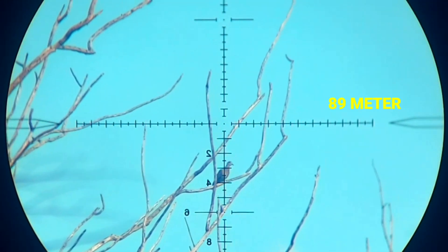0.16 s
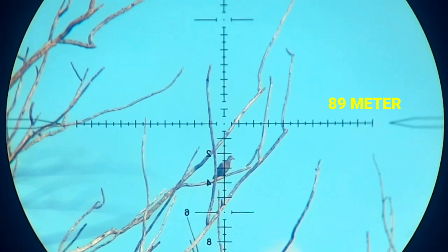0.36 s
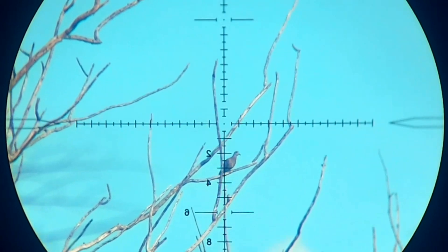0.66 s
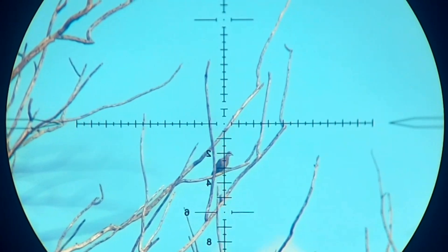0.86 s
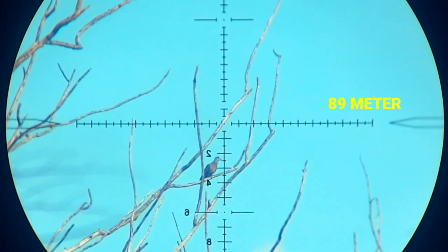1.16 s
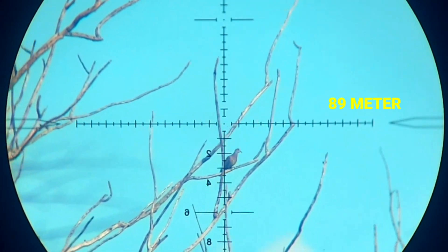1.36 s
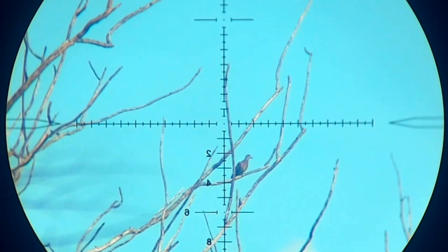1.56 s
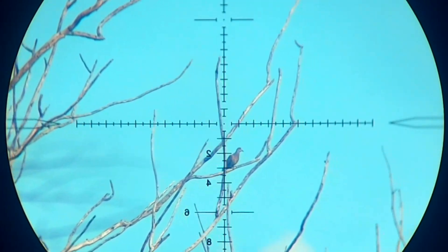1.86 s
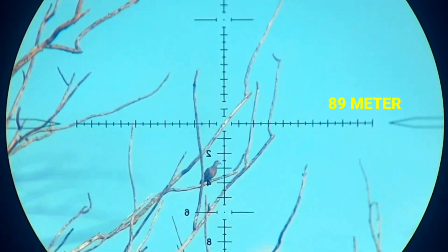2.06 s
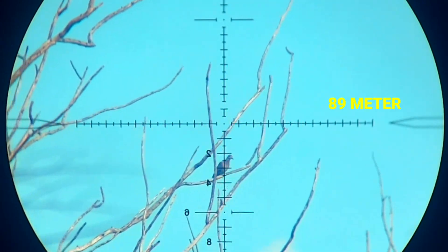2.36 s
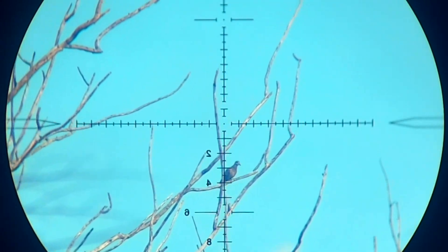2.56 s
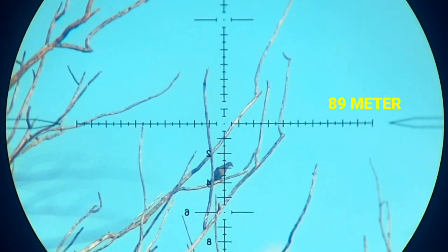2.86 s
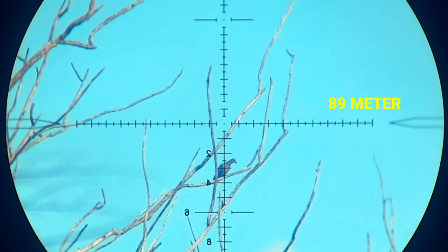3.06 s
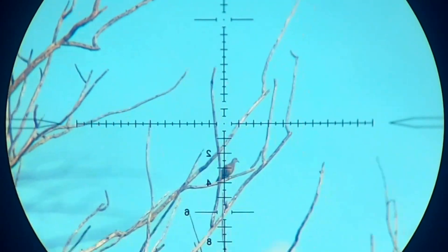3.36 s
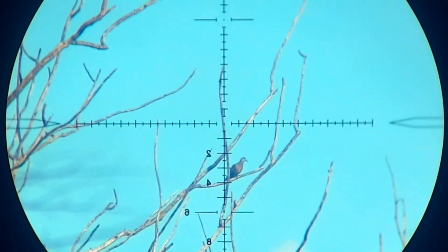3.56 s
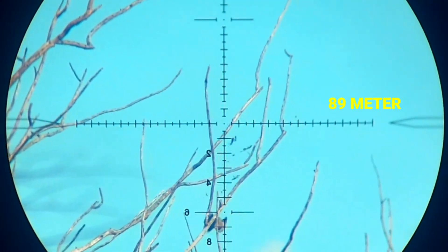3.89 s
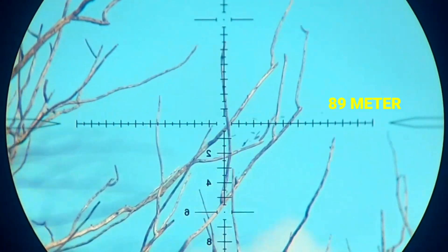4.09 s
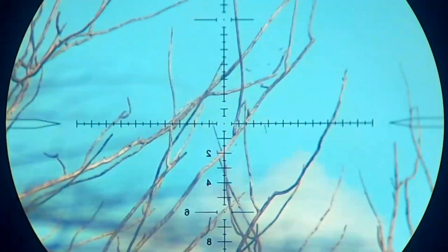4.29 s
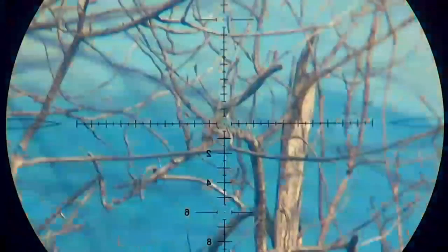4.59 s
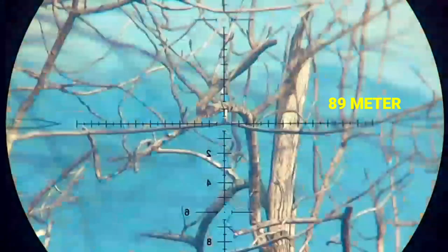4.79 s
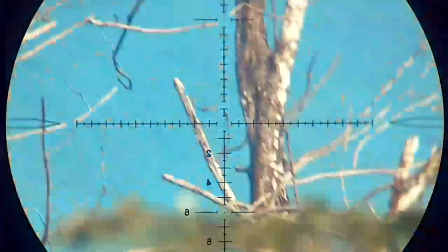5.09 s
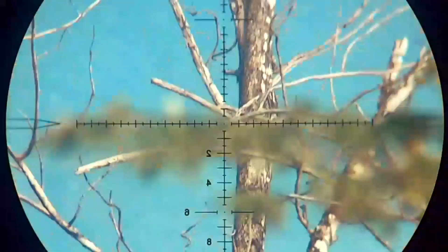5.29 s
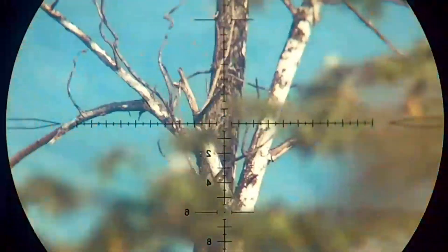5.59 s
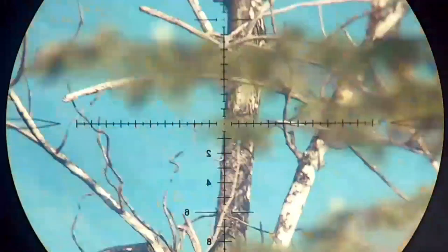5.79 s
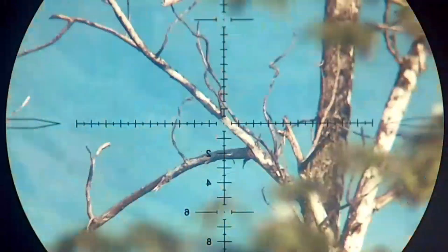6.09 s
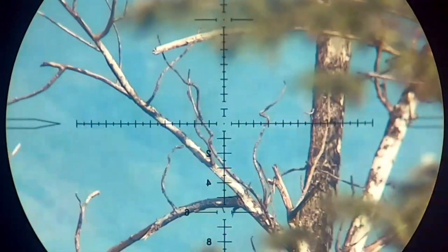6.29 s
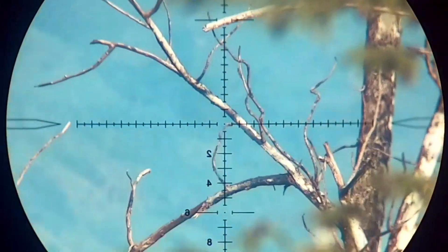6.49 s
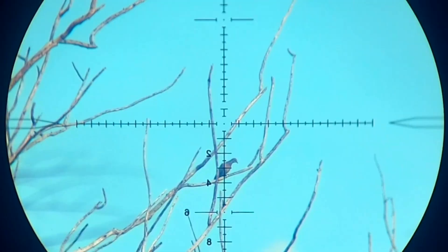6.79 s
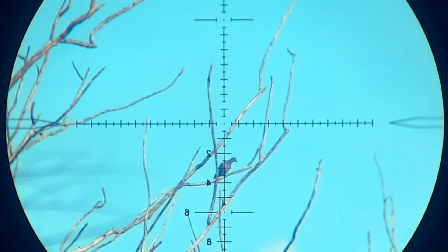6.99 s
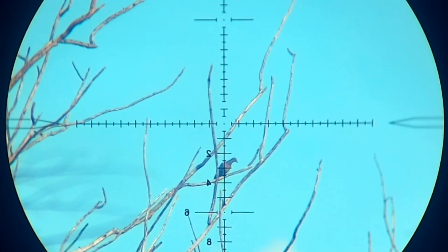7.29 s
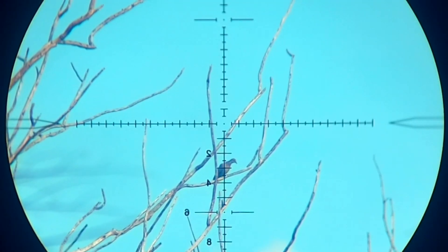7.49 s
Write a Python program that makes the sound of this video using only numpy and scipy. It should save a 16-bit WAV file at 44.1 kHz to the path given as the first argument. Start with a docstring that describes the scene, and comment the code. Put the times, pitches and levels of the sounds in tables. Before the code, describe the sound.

A busy bird colony chatters over leaves and insects; an air rifle cracks once, hands clatter on its stock, and low humming rumble takes over.

```python
"""Air rifle among a colony of birds

Birds whistle, rasp and tick (gliding tones and pulsed resonances) in the trees, over leaves and insects
(coloured noise). An air rifle fires once right at the microphone: noise blasts strike the decaying modes of
coils, spring and barrel. The pellet's distant double hit returns; hands then rub (slipping noise) and knock
(struck modes) on the stock, among short soft noise bursts. At the end a dull, humming rumble of low noise and
wavering tones sets in, and all outdoor sound breaks off abruptly with a small click."""
import sys
import numpy as np
from scipy import signal
from scipy.fft import rfft, irfft, next_fast_len
from scipy.io import wavfile
from scipy.ndimage import map_coordinates

SR = 44100
rng = np.random.default_rng(int(sys.argv[2]) if len(sys.argv) > 2 else 0)


def to_wav(sig):
    """Store sig (one row per channel, or 1-D mono) as 16-bit WAV at the path in sys.argv[1].

    Samples outside -1..1 are clipped; the rate is SR.
    """
    pcm = np.clip(np.atleast_2d(sig), -1, 1) * 32767
    pcm = np.round(pcm).astype(np.int16)
    wavfile.write(sys.argv[1], SR, pcm.T)  # frames by channels


N = 337365
TIME = np.arange(N) / SR
SHOT_S, BIRDS_END_S = 3.48, 6.828
CHIP_OVERTONE_DB = -22.5
# Modes excited by knocks, thumps and rattle. Each row: nominal frequency in Hz, t60 in seconds, level in dB.
STOCK_MODES = [(67.8, 0.44, -18), (102.7, 0.61, -11), (132.6, 0.2, -8.5), (194, 0.23, -2.5),
               (272.6, 0.11, 4), (374, 0.036, -2), (549.3, 0.059, 7.5), (633, 0.032, -9), (806, 0.022, 12),
               (831, 0.026, 3), (915, 0.23, -11), (1077, 0.051, -3), (1268, 0.054, -2), (1394, 0.041, -4),
               (1716, 0.042, -5.5), (1980, 0.046, 1.5), (2320, 0.0084, -2.5), (3210, 0.028, -0.5)]


def undb(db):
    """Amplitude gain is ten to the power of the decibels over twenty."""
    return 10 ** (np.asarray(db) / 20)


def unit(x):
    """Normalisation: mean power is brought to 1."""
    return x / np.sqrt(np.mean(x ** 2) + 1e-20)


def curves(table):
    """Linear interpolation: the columns after the time in seconds, one value a sample."""
    s, *columns = np.transpose(table)
    return [np.interp(TIME, s, c) for c in columns]


def add(track, s, x):
    """Superposition: x is summed into the track from time s."""
    i = int(np.clip(s * SR, 0, N - 1))
    track[..., i:i + x.shape[-1]] += x[..., :N - i]


def colour(x, points):
    """Spectral shaping: x is filtered by a curve through (Hz, dB) points, then brought to rms 1."""
    hz, db = np.transpose(points)
    n = next_fast_len(x.shape[-1])
    f = np.maximum(np.fft.rfftfreq(n, 1 / SR), 1)
    gain = undb(np.interp(np.log(f), np.log(hz), db))
    return unit(irfft(rfft(x, n) * gain, n)[..., :x.shape[-1]])


def band(x, low_hz, high_hz, order=2):
    """Band-pass filtering: only the range between two edges is transmitted."""
    return signal.sosfilt(signal.butter(order, [low_hz, high_hz], "band", fs=SR, output="sos"), x)


def walk(rate, size=N):
    """Random modulation: lines join normal draws, rate of them a second, with a spread near 1."""
    place = np.arange(size) * rate / SR
    draws = rng.standard_normal(int(place[-1]) + 3)
    return map_coordinates(draws, [place], order=1) * np.sqrt(3 / 2)


def ring(t, hz, t60):
    """Free damped vibration: a struck mode loses 60 dB in t60 seconds."""
    return np.sin(2 * np.pi * hz * t) * np.exp(-np.log(1000) * t / t60)


def swell(t, length, attack, release):
    """Exponential relaxation: a rise, a hold, and a decay after the given length."""
    return (1 - np.exp(-t / attack)) * np.exp(-np.maximum(t - length, 0) / release)


def far_port(x, lag_s=.00054):
    """Time of flight: sound reaches the farther microphone port a fraction of a millisecond late."""
    return np.pad(x, (round(abs(lag_s) * SR), 0))[:len(x)]


def after_shot(s):
    """Time step: true for times in the duller part after the shot."""
    return s > SHOT_S


def background(early_db=-56.5, later_db=-62, insect_db=-64, left_db=-4.0):
    """Diffuse field: independent noise in two channels is leaves, far rumour and insects; duller after the shot."""
    # From the lowest leaves and rumour to the chatter of the farthest trees. Each row: Hz, level in dB.
    tree_spectrum = [(30, -1), (95, -16), (160, 8), (300, -7.5), (520, -12), (760, -7), (1050, -15),
                     (1600, -13), (2100, -1.5), (3100, -1), (4000, -8), (5500, -8), (6300, -24.5),
                     (9000, -42.5), (12000, -64.5)]
    # The same, duller, after the shot. Each row: Hz, level in dB.
    later_spectrum = [(18, -52), (30, -30.5), (92, -30.5), (164, -8.5), (503, -30), (690, -26), (994, -30),
                      (1540, -32), (1960, -2), (2160, -11), (2830, -25), (3430, -27), (4070, -20.5),
                      (6000, -35.5), (10000, -50), (13000, -85.5), (22000, -120)]
    # Insects far off. Each row: Hz, level in dB.
    insect_spectrum = [(4500, -25), (5500, 4), (6300, -11.5), (6900, 1.5), (7400, -2.5), (7900, -18),
                       (8700, -25), (10500, -55)]
    early = np.interp(TIME, [SHOT_S, SHOT_S + .06], [1, 0])
    trees = colour(rng.standard_normal((2, N)), tree_spectrum) * undb(early_db + walk(5.7))
    insect_level_db = insect_db + 2.0 * walk(55) + 1.5 * walk(4.6)
    insects = colour(rng.standard_normal((2, N)), insect_spectrum) * undb(insect_level_db)
    later = colour(rng.standard_normal((2, N)), later_spectrum) * undb(later_db + walk(4.7))
    return early * (trees + insects) * undb([[left_db], [0]]) + (1 - early) * later


def later_insects(insect_db=0, pulse_db=4.5):
    """Amplitude modulation: a lower, finely flickering hiss of insects swells and fades after the shot."""
    # Insects after the shot. Each row: Hz, level in dB.
    hiss_spectrum = [(3000, -26.5), (3900, 2.5), (4500, 4), (5050, -9.5), (5700, -27), (8000, -48.5)]
    # Swelling and fading of their hiss. Each row: time in seconds, level in dB.
    hiss_level = [(3.55, -90), (3.62, -72), (3.92, -71), (4.1, -59.5), (4.35, -70.5), (4.65, -57),
                  (5.2, -60), (5.55, -58), (5.85, -62), (6.35, -68), (6.55, -61.5), (6.83, -58)]
    hiss = colour(rng.standard_normal(N) * undb(pulse_db * walk(120)), hiss_spectrum)
    return hiss * undb(curves(hiss_level)[0] + insect_db) * after_shot(TIME)


def colony_level(t):
    """Incoherent addition: the far colony's bell-shaped waves add as powers over a lull, in dB at times t."""
    # The far colony flares up. Each row: crest in seconds, half width in seconds, level in dB.
    waves = [(.2, 0.57, -53), (2.06, 0.18, -51), (2.5, 0.33, -55.5), (3.65, 0.037, -66), (4.2, 0.2, -62),
             (4.95, 0.25, -54.5), (5.619, 0.33, -53.5), (6.15, 0.14, -51.5), (6.6, 0.15, -51.5)]
    lull_db = -77
    bells = sum((undb(db) * np.exp(-.5 * ((t - s) / width) ** 2)) ** 2 for s, width, db in waves)
    return 10 * np.log10(undb(lull_db) ** 2 + bells)


def far_colony(colony_db=-1, ripple_db=3):
    """Random frequency and amplitude modulation: many far calls merge into a chatter in shifting pitch regions."""
    # Colour of the merged calls. Each row: Hz, level in dB.
    chatter_spectrum = [(1500, -38.5), (1850, -3.5), (2100, -3.5), (3000, 1.5), (3700, 0), (4400, -4),
                        (5500, -14), (6500, -18.5), (9000, -45.5)]
    chatter = 0
    for hz in np.geomspace(1950, 5600, num=9):
        pitch = hz * np.exp(.05 * walk(25) + 0.058 * walk(1200))
        grain = undb(ripple_db * walk(16) + 4.4 * walk(260))
        chatter = chatter + grain * np.sin(2 * np.pi * np.cumsum(pitch) / SR)
    return colour(chatter, chatter_spectrum) * undb(colony_level(TIME) + colony_db)


def rasp(length, low_hz, high_hz, upper_db, hiss_db, pulse_hz=125, jitter=.16, scatter_db=2.5,
         pulse_s=0.00087, spread=0.098, noisy=0.9, width_hz=780, fall=0.18):
    """Pulsed excitation: the syrinx opens unevenly, puffing hiss and tiny falling chirps in two sinking resonances."""
    t = np.arange(int((length + 0.021) * SR)) / SR
    cycle = np.cumsum(pulse_hz * np.exp(jitter * walk(70, size=len(t)))) / SR
    k = cycle.astype(int)
    age = (cycle - k) / pulse_hz / pulse_s  # time since the opening, in pulse rise times
    size, bend_low, bend_high = rng.standard_normal((k[-1] + 1, 3))[k].T
    gate = (age * np.exp(1 - age) + 1.2) * undb(scatter_db * size)
    sink = fall * (.5 - np.minimum(t / length, 1))
    out = 0
    for hz, bend, db, slide in ((low_hz, bend_low, 0, sink), (high_hz, bend_high * .6, upper_db, sink / 2)):
        pitch = hz * np.exp(slide + spread * (.7 * bend + np.exp(-age / 2) - .5))
        grit = 1 + noisy * walk(1800, size=len(t))
        voice = gate * grit * np.sin(2 * np.pi * np.cumsum(pitch) / SR)
        out = out + undb(db) * unit(band(voice, hz - width_hz, hz + 0.71 * width_hz, order=2))
    hiss = unit(gate * band(rng.standard_normal(len(t)), low_hz, high_hz))
    return (out + undb(hiss_db) * hiss) * swell(t, length, 0.011, 0.0021)


def rasp_call(s, length, hz, db, upper_db=-3, hiss_db=-12):
    """Resonance tracking: the upper resonance lies near the octave, up to a ceiling that is lower after the shot."""
    ceiling_hz = 4215 if after_shot(s) else 5650
    upper_hz = min(2.03 * hz, ceiling_hz)
    return undb(db) * rasp(length, hz, upper_hz, upper_db, hiss_db)


def whistle(length, first_hz, last_hz, octave_db, quaver, flutter_db=3, hoarse=0.43):
    """Frequency modulation: a slur with its octave, made hoarse by fast irregular trembling of the syrinx."""
    even_slur_s = 0.04  # a note of this length glides evenly; a longer one holds its pitch before it slides
    t = np.arange(int((length + 0.045) * SR)) / SR
    glide = np.minimum(t / length, 1) ** (length / even_slur_s)
    pitch = (first_hz + (last_hz - first_hz) * glide) * (1 + quaver * walk(500, size=len(t)))
    phase = 2 * np.pi * np.cumsum(pitch) / SR
    tone = np.sin(phase) + undb(octave_db) * np.sin(2 * phase)
    tremble = undb(flutter_db * walk(220, size=len(t))) * (1 + hoarse * walk(900, size=len(t)))
    return unit(tone * tremble) * swell(t, length, 0.0073, 0.0031)


def whistle_call(s, length, first_hz, last_hz, db, quaver=0.045):
    """Harmonic balance: a slur's octave depends on its mean pitch and is held down after the shot."""
    # Octave of a slur, before the limit after the shot. Each row: mean pitch in Hz, octave level in dB.
    octave_curve = [(2000, -12), (2650, -17), (3100, -9.5), (3300, -7)]
    octave_db = np.interp((first_hz + last_hz) / 2, *np.transpose(octave_curve))
    if after_shot(s):
        octave_db = min(octave_db, -15)
    return undb(db) * whistle(length, first_hz, last_hz, octave_db, quaver)


def chip(hz, overtone_db, rise_s=0.0012, fall=0.11, snap_db=-11):
    """Transient excitation: a tick is a broad snap and a few milliseconds of steeply falling pitch."""
    age = np.arange(int(0.02 * SR)) / SR / rise_s  # in rise times
    bend = fall * (2 * np.exp(-age / 2) - 1) + 0.053 * walk(1500, size=len(age))
    phase = 2 * np.pi * np.cumsum(hz * (1 + bend)) / SR
    snap = unit(band(rng.standard_normal(len(age)), .7 * hz, 1.3 * hz))
    tone = np.sin(phase) + undb(overtone_db) * np.sin(1.7 * phase)
    return age * np.exp(1 - age) * (tone + undb(snap_db) * snap)


def faint_calls(count, low_hz=2000, high_hz=3200, length=0.052, fall=0.088):
    """Random scattering in time: birds farther off rasp, tick and slur, as loud as the colony is busy."""
    rasp_db, chip_db, slur_db = -3, 5.5, 0  # over the level of the far colony
    out = np.zeros(N)
    for k, chance in enumerate(rng.random((count, 6))):
        times = (k + chance[:3]) * BIRDS_END_S / count
        hz = low_hz * (high_hz / low_hz) ** chance[3:]
        db = colony_level(times)
        add(out, times[0], rasp_call(times[0], length, hz[0], db[0] + rasp_db))
        add(out, times[1], undb(db[1] + chip_db) * chip(hz[1], CHIP_OVERTONE_DB))
        add(out, times[2], whistle_call(times[2], length, hz[2], hz[2] * (1 - fall), db[2] + slur_db))
    return out


def birds(rasp_db=-3.1, whistle_db=-1, chip_db=1):
    """Superposition of near and faint calls; the band-pass removes what lies under the syrinx's lowest note."""
    # Buzzy calls. Each row: start in seconds, length in seconds, nominal pitch in Hz, level in dB before
    # the common trim, upper resonance in dB, hiss in dB.
    rasps = [(0, .083, 2816, -36.5, -12.5, -17), (0.119, 0.017, 2680, -38, -9, -11),
             (0.241, 0.054, 2887, -38.5, -6.5, -21), (0.407, .11, 2834, -40, -7.5, -17),
             (.984, .034, 3080, -50.5, -12, 0), (1.195, .021, 2930, -37.5, -7.5, -8),
             (1.425, 0.058, 2705, -44.5, -13.5, -14), (1.851, .12, 2746, -45.5, -13, 2),
             (2.033, 0.063, 2526, -47.5, -3.5, -3), (2.128, 0.1, 2583, -51, 0.5, -6),
             (2.309, 0.035, 2440, -42, -15, -7), (2.356, 0.089, 2477, -46, -9, -11),
             (2.561, .09, 2390, -46, -3.5, -7.5), (2.629, 0.12, 2800, -55, 4.5, -6),
             (2.747, 0.11, 2264, -46, -5.5, -9), (2.924, 0.05, 2338, -45.5, -5, -6),
             (3.204, .022, 2860, -41, -4, -2), (3.261, .06, 2620, -47.5, -4, -7),
             (3.44, .014, 2665, -32, -9, -13), (3.601, 0.085, 2394, -63.5, -1.5, -6),
             (3.67, 0.0375, 2530, -49, -12, -7.5), (3.989, 0.2, 2118, -51, -1.5, -20),
             (4.205, 0.16, 2098, -57, -1.5, -17), (4.58, 0.14, 2110, -54, -2, -17.5),
             (4.881, 0.036, 2490, -44, -1, -8), (5.125, .043, 2685, -45, -4, -8),
             (5.529, 0.071, 2980, -39.5, -13, -4), (5.971, 0.038, 2820, -39, -7, -9),
             (6.277, .029, 2920, -50.5, -1.5, -2), (6.485, .11, 2815, -53, 2, -6),
             (6.665, 0.048, 2915, -55.5, -0.5, 2)]
    # Slurred notes. Each row: start in seconds, length in seconds, first and last pitch in Hz, level in dB
    # before the common trim, quaver as a share of the pitch.
    slurs = [(0.425, 0.046, 3410, 3100, -46, 0.037), (0.643, 0.066, 3400, 2990, -44, 0.064),
             (0.695, 0.051, 2990, 1894, -43, 0.057), (1.703, 0.048, 3470, 2840, -42.5, 0.057),
             (1.885, 0.019, 3050, 3030, -40, 0.018), (2.04, 0.096, 2600, 2010, -50.5, 0.027),
             (2.146, 0.046, 2318, 1920, -40, 0.03), (2.36, .08, 2147, 2030, -55, .03),
             (2.923, 0.059, 2635, 1975, -46, 0.029), (3.106, 0.06, 2330, 1944, -42, 0.037),
             (3.201, 0.025, 3530, 3116, -42.5, 0.067), (3.217, 0.032, 2280, 1870, -45, .025),
             (3.263, .065, 1851, 2130, -41.5, 0.045), (3.437, 0.027, 2800, 2166, -32.5, 0.014),
             (3.794, 0.033, 1956, 2024, -49.5, .02), (3.973, 0.071, 2080, 1910, -47, 0.013),
             (4.143, 0.033, 2090, 1905, -51, .025), (4.411, 0.033, 2720, 1846, -46.5, .03),
             (4.474, 0.052, 1952, 2063, -45.5, 0.016), (4.748, .032, 2760, 2428, -42, 0.026),
             (4.915, 0.058, 3320, 3050, -39.5, 0.021), (5.388, 0.051, 2474, 2237, -42, 0.03),
             (6.068, 0.03, 3150, 3110, -45, 0.037), (6.243, 0.051, 3186, 3163, -49, 0.034),
             (6.477, 0.12, 3200, 3020, -49, 0.065), (6.716, 0.05, 2186, 2122, -43, 0.006),
             (6.767, 0.071, 3167, 3340, -40.5, 0.024)]
    # Ticks. Each row: time near the peak in seconds, level in dB before the common trim, nominal pitch in Hz.
    ticks = [(.2495, -35, 3000), (0.346, -42, 2940), (.415, -33, 2820), (.91, -39.5, 4860),
             (.9783, -37, 4660), (1.005, -46, 3070), (1.062, -46, 3260), (1.1412, -42, 3070),
             (1.2, -35, 2960), (1.264, -44.5, 3130), (1.3175, -39.5, 3040), (1.371, -40, 3050),
             (1.424, -36.5, 3030), (1.464, -42, 2850), (1.478, -42, 3120), (1.538, -46, 3000),
             (1.607, -42.5, 3390), (2.3063, -37.5, 3413), (2.931, -39, 2380), (3.077, -48, 1980),
             (3.078, -45, 4640), (3.9928, -34.5, 1940), (4.26, -46.5, 3800), (4.272, -46, 3670),
             (4.284, -49, 3220), (4.292, -40, 2360), (5.2835, -29, 2050), (5.394, -28, 2410),
             (5.523, -36, 2060), (5.649, -34, 1970), (5.665, -36, 2980), (5.785, -43, 3300),
             (5.848, -41, 3520), (5.9586, -32, 2270), (5.9945, -31.5, 2720), (6.004, -32, 2640),
             (6.022, -35, 2360), (6.0325, -36, 2180), (6.2654, -31, 2100), (6.284, -35.5, 3170),
             (6.432, -29, 2120), (6.451, -34.5, 2130), (6.453, -37, 4330), (6.4692, -27.5, 2480),
             (6.478, -30, 2690), (6.51, -34, 2110), (6.557, -37, 2140), (6.6731, -27.5, 2075),
             (6.712, -22.5, 2144)]
    out = faint_calls(count=12)
    for s, *call in rasps:
        add(out, s, undb(rasp_db) * rasp_call(s, *call))
    for s, *call in slurs:
        add(out, s, undb(whistle_db) * whistle_call(s, *call))
    for s, db, hz in ticks:
        add(out, s - .001, undb(db + chip_db) * chip(hz, CHIP_OVERTONE_DB))
    return band(out, low_hz=1828, high_hz=6340, order=7)


def among_trees(x, t60=0.22, echo_db=-3.5, left_db=-5):
    """Scattering: direct sound comes from the right; trunks and branches send a short tail to both ports."""
    t = np.arange(int(.45 * SR)) / SR
    tail = rng.standard_normal((2, len(t))) * np.exp(-np.log(1000) * t / t60) * (1 - np.exp(-t / 0.0015))
    tail /= np.sqrt(np.sum(tail ** 2, axis=1, keepdims=True))
    direct = np.array([undb(left_db) * far_port(x), x])
    return direct + undb(echo_db) * signal.fftconvolve(x[None], tail, axes=1)[:, :N]


def stop_click(click_db=-32, decay_s=0.0012):
    """Impulsive noise: a small dry click, decaying exponentially, where the outdoor sound breaks off."""
    out = np.zeros(N)
    t = np.arange(int(0.0203 * SR)) / SR
    spectrum = [(300, -11), (800, 7.5), (1800, 5), (4000, -19), (8000, -34), (15000, -45)]
    click = colour(rng.standard_normal(len(t)), spectrum)
    add(out, BIRDS_END_S - .003, undb(click_db) * click * np.exp(-t / decay_s))
    return out


def rumble(heave_db=-43, waver=0.01232):
    """Noise and tones combined: a dull rustling rumble over a slow heave, with a wavering hum in it."""
    # Lower part of the rumble. Each row: Hz, level in dB.
    low_spectrum = [(12, -30), (20, -9), (43, -7), (108, -2.5), (145, -5), (221, -10.5), (256, -14.5),
                    (286, -16), (380, -32), (490, -53), (840, -120)]
    # Its upper, rustling part. Each row: Hz, level in dB.
    high_spectrum = [(200, -14.5), (330, -2), (430, -0.5), (700, -12), (1100, -20.5), (2300, -28),
                     (2450, -66)]
    # Harmonics of the hum. Each row: nominal frequency in Hz, nominal rms level in dB.
    hum_partials = [(145, -44), (290, -54), (435, -61.5)]
    heave_spectrum = [(2, -20.0), (7, -8.5), (13, -13.0), (35, -11.5), (100, -63.0), (400, -140)]
    start_s, settle_s = 6.478, 0.66
    age = np.maximum(TIME - start_s, 0)
    low_db = -37.5 - 1.5 * age  # sinks slowly
    high_db = -57 + 12.5 * np.exp(-age / settle_s)  # settles soon after the onset
    low = colour(rng.standard_normal(N), low_spectrum) * undb(low_db)
    high = colour(rng.standard_normal(N) * undb(1.2 * walk(50)), high_spectrum) * undb(high_db)
    heave = undb(heave_db) * colour(rng.standard_normal(N), heave_spectrum)
    turns = np.cumsum(1 + waver * walk(8)) / SR  # wavering time shared by the harmonics
    hum = sum(np.sqrt(2) * undb(db + 2 * walk(6.2)) * np.sin(2 * np.pi * hz * turns)
              for hz, db in hum_partials)
    return (low + high + heave + hum) * np.clip((TIME - start_s) / 0.00066, 0, 1)


def soft_bursts(burst_db=0):
    """Band-limited noise: short soft bursts are low rustles, scrapes, hum after knocks and thumps in the rumble."""
    # Short soft noise bursts. Each row: start in seconds, length in seconds, level in dB, centre in Hz,
    # ratio of either edge to the centre.
    bursts = [(1.851, 0.055, -55, 179, 1.36), (2.345, 0.049, -65.5, 288, 1.44),
              (5.01, 0.028, -34.5, 190, 1.22), (5.055, 0.039, -37.5, 162, 1.7),
              (5.558, 0.05, -39, 1144, 1.7), (5.577, 0.15, -38.5, 252, 1.12),
              (5.705, 0.068, -38.5, 93, 1.2), (5.966, 0.026, -30.5, 700, 1.47),
              (6.034, 0.061, -39.5, 1480, 1.77), (6.215, 0.062, -46.5, 1630, 2.02),
              (6.48, 0.024, -37.5, 209, 1.55), (6.515, 0.034, -35, 57.5, 1.3),
              (6.697, 0.032, -41, 300, 1.12), (7.089, 0.011, -37, 417, 1.25)]
    out = np.zeros(N)
    t = np.arange(int(.25 * SR)) / SR
    for s, length, db, hz, width in bursts:
        grains = rng.standard_normal(len(t)) * undb(1.6 * walk(300, size=len(t)))
        burst = unit(band(grains, hz / width, hz * width, order=3))
        add(out, s, undb(db + burst_db) * burst * swell(t, length, 0.0031, 0.0097))
    return out


def rubbing(rub_db=0, scrape_db=-6, grain_db=4):
    """Sliding friction: hands move on the stock in small slips that roughen the noise."""
    # Hands sliding on the stock. Each row: time in seconds, level in dB before the trims.
    effort = [(4.6, -70), (4.718, -60), (4.842, -51.5), (5.022, -47), (5.192, -41.5), (5.36, -41.5),
              (5.47, -58.5), (5.872, -54), (6.156, -58.5), (6.45, -60)]
    # Low part of the sliding. Each row: Hz, level in dB.
    low_spectrum = [(24, -38.5), (40, -8.5), (92, -4.5), (124, -8), (199, -6), (292, -13), (364, -20),
                    (500, -17.5), (650, -61), (1100, -120)]
    # Scraping part. Each row: Hz, level in dB.
    high_spectrum = [(260, -61), (450, -18.5), (585, 6.5), (856, 3), (994, 5), (1110, 4), (1470, -3),
                     (2000, -24), (2600, -38), (4400, -120)]
    effort_db = curves(effort)[0]
    slips = undb(grain_db * walk(110))
    low = colour(rng.standard_normal(N) * slips, low_spectrum) * undb(effort_db + rub_db)
    high = colour(rng.standard_normal(N) * slips, high_spectrum) * undb(effort_db + scrape_db)
    return (low + high) * np.interp(TIME, [4.55, 4.65, 6.4, 6.5], [0, 1, 1, 0])


def rattle(slips_per_s=260, scatter_db=4.5, damped_s=0.015):
    """Stick-slip: the shifting grip ticks densely into the stock's upper modes, damped by the hand."""
    # The grip shifts. Each row: start in seconds, length in seconds, level in dB.
    shifts = [(4.766, 0.055, -49.5), (5.133, 0.12, -41.5), (5.557, .16, -47)]
    lowest_hz = 480  # modes up to this are not stirred
    out = np.zeros(N)
    t = np.arange(int(.4 * SR)) / SR
    for s, length, db in shifts:
        slips = (rng.random(len(t)) < slips_per_s / SR) * undb(scatter_db * rng.standard_normal(len(t)))
        body = 0
        for hz, t60, mode_db in STOCK_MODES:
            if hz > lowest_hz:
                ticks = slips * rng.standard_normal(len(t))
                response = ring(t, hz, min(t60, damped_s))
                body = body + undb(mode_db) * signal.fftconvolve(ticks, response)[:len(t)]
        grating = unit(band(body, low_hz=300, high_hz=4500, order=3))
        add(out, s, undb(db) * grating * swell(t, length, 0.0061, 0.014))
    return out


def knocks_and_thumps(knock_db=-1, chatter_db=-6, tone_db=2, tick_db=-44, tick_s=.0022, rise_s=0.0034,
                      waver=0.066):
    """Modal excitation: each blow rings the modes; its spot sounds a short note and grates, hard contacts tick."""
    # First the pellet's distant double hit (two rows), then knocks on the stock. Each row: time in seconds,
    # level in dB before the trims, hardness in dB more clack and less thud, nominal note of the spot in Hz,
    # contact rise in seconds, tick in dB before its trims.
    contacts = [(4.055, -60, 4, 596, .004, -7), (4.082, -59.5, 7, 1110, 0.0036, -7),
                (4.397, -69.5, 7, 1100, .004, -10.5), (4.667, -43.5, -.5, 586, 0.0047, -9),
                (4.714, -48, 0.5, 816, 0.0051, -5), (4.742, -62, 0.5, 1510, .002, 14),
                (4.784, -41, 4, 1780, 0.005, 4), (4.814, -55, 1.5, 900, .003, 14.5),
                (4.993, -39, -9, 545, 0.0078, -9), (5.118, -46.5, -12, 167, 0.0035, -5),
                (5.147, -41, 6.5, 600, 0.0028, 4), (5.172, -43, 3, 736, 0.0055, 1),
                (5.207, -37.5, 1, 584, 0.0047, 1), (5.234, -37.5, -1.5, 620, 0.0045, 3),
                (5.261, -36, -1.5, 636, 0.0056, 0), (5.287, -36.5, 0, 550, .0045, -4),
                (5.312, -43, -12, 192, 0.0037, -5), (5.334, -40.5, 4, 1490, 0.0027, -4),
                (5.3405, -28.5, 7, 1510, .0036, -2), (5.355, -41, -4, 302, 0.0022, -5),
                (5.373, -43.5, -5, 150, 0.0057, -3), (5.439, -33, 5, 546, 0.0038, -3),
                (5.447, -40, -4.5, 270, 0.0056, -8), (5.482, -56.5, 10.5, 1290, 0.0037, -4),
                (5.569, -32, 2, 774, .0035, -3), (5.601, -27, 3, 1685, 0.0042, 6),
                (5.623, -40, 0, 285, 0.0064, -4), (5.65, -47, -3.5, 292, 0.0042, -4),
                (5.684, -31.5, 2, 554, 0.005, -7), (5.704, -27.5, 4.5, 1710, 0.0025, -9),
                (5.816, -43, 0, 1240, 0.0041, -6), (5.899, -43.5, -4.5, 574, 0.0038, -12),
                (5.979, -29, 1.5, 662, .0065, 7), (6.132, -58.5, 14, 1515, .004, 5)]
    # Middle modes against a blow's level; heavy blows mostly go into thud and clack instead.
    # Each row: blow level in dB, middle level in dB relative to it.
    middle_curve = [(-61, 7), (-36.5, 2), (-34, -2.5), (-16, 4.5)]
    tick_spectrum = [(500, -7.0), (2000, 0.5), (4500, -9), (8500, -8.0), (10000, -54.0)]
    zone_hz = [250, 700, 1500]  # thud, middle, clack
    out = np.zeros(N)
    t = np.arange(int(.35 * SR)) / SR

    def push(length):
        """Contact force: a smooth pulse that peaks after the given length."""
        return (t / length) ** 2 * np.exp(2 - 2 * t / length)

    for s, level_db, hard_db, spot_hz, contact_s, sharp_db in contacts:
        middle_db = np.interp(level_db, *np.transpose(middle_curve))
        zones = level_db + np.array([-hard_db, middle_db, hard_db])
        zone_db = lambda hz: np.interp(np.log(hz), np.log(zone_hz), zones)
        detune = 1 + .045 * rng.standard_normal(len(STOCK_MODES))
        sign = rng.choice([-1, 1], len(STOCK_MODES))
        body = sum(g * undb(db + zone_db(hz)) * ring(t, hz * d, t60)
                   for (hz, t60, db), d, g in zip(STOCK_MODES, detune, sign))
        grate = sum(undb(db) * unit(band(rng.standard_normal(len(t)), hz / 1.307, hz * 1.305, order=3))
                    for hz, db in zip(zone_hz, zones))
        pitch = spot_hz * (1 + waver * walk(300, size=len(t)))
        note = undb(zone_db(spot_hz)) * np.sin(2 * np.pi * np.cumsum(pitch) / SR)
        tick = colour(rng.standard_normal(len(t)), tick_spectrum)
        tick_level_db = (level_db + hard_db) / 2 + tick_db + sharp_db
        add(out, s - .003, push(contact_s) * (undb(chatter_db) * grate + undb(tone_db) * note))
        add(out, s - .003, push(tick_s) * undb(tick_level_db) * tick)
        add(out, s - .002, undb(knock_db) * body * (1 - np.exp(-t / rise_s)) ** 2)
    return out


def bounces(count):
    """Periodic impact: the spring bounces evenly in a swelling and fading rattle; rows as for the shot's blows."""
    start_s, gap_s, decay_s = 3.4905, .0083, 0.0091
    level_db, swell_db, thump_db, tilt_db = -23.5, 3.5, -11.5, -1.5
    return [(start_s + k * gap_s, level_db + swell_db * np.sin(np.pi * (k + .5) / count),
             decay_s, thump_db, tilt_db) for k in range(count)]


def shot(left_db=-3, own_db=-9, low_hz=70, blast_db=2, body_db=-9, coil_db=-9, lag_s=.0004):
    """Impulse response: hammer, air blast and spring rattle thump and clang the rifle; spring and barrel ring on."""
    # Blows from sear to air blast and the piston's rebound. Each row: start in seconds, level in dB before
    # the blast trim, decay in seconds, recoil thump in dB, brightness in dB per octave.
    blows = [(3.443, -43.5, 0.016, -46.5, -0.5), (3.456, -30, 0.033, -42, -1.5),
             (3.4683, -26.5, 0.0073, -22, 2.5), (3.4748, -9, 0.004, -11, 0), (3.48, -7.5, 0.0025, -8.5, 0),
             (3.496, -19, 0.0065, -16, -0.5), (3.5132, -15, 0.0076, -32.5, -2.5)]
    # Blast before the brightness tilt. Each row: Hz, level in dB.
    blast_spectrum = [(210, -56), (350, -19.5), (429, -16.5), (495, -17.5), (721, -8), (928, -11.5),
                      (1050, 4), (1370, -3.5), (1740, -0.5), (2200, -11.5), (2750, -17.5), (3590, -20.5),
                      (4200, -30), (6000, -27), (8520, -26), (11000, -47), (15000, -63.5)]
    # The spring's coils clang at each blow. Each row: Hz, t60 in seconds, level in dB before the coil trim.
    coil_modes = [(690, 0.044, -10.5), (1090, 0.051, -8.5), (1230, .055, 4), (1428, 0.059, 2),
                  (1705, 0.043, 0.5), (1892, .04, -3.5)]
    # Modes that the recoil sets ringing. Each row: Hz, t60 in seconds, level in dB relative to the thump,
    # amplitude in the left channel as a signed share of the right.
    recoil_modes = [(74, 0.19, -4.5, .1), (126, 0.082, -14, 0.13), (198, 0.087, -11.5, -0.14),
                    (242.7, 0.067, 1, -0.34), (290, 0.046, -11, -0.33), (407, 0.091, -13.5, -0.34)]
    # The piston slams home with a short hard crack. Each row: Hz, t60 in seconds, level in dB, left share.
    slam_modes = [(1350, .024, -7, -.3), (1790, .026, -9, 0.77), (2010, .02, -12, .9)]
    # Spring and barrel ring on. Each row: Hz, t60 in seconds, level in dB before the slow rise, left share.
    long_rings = [(97, .34, -25, .05), (113, .22, -21, .05), (142, .31, -13.5, .06), (194, .3, -31, .1),
                  (929, .26, -14.5, -.3)]
    pivot_hz = 1500  # brightness tilts the blast about this frequency
    slam_s, ring_rise_s = 3.4808, .025  # the long rings build up over the rattle
    out = np.zeros((2, N))
    t = np.arange(int(.6 * SR)) / SR
    for s, db, decay, thump_db, tilt_db in blows + bounces(count=5):
        spectrum = [(hz, level_db + tilt_db * np.log2(hz / pivot_hz)) for hz, level_db in blast_spectrum]
        noise = colour(rng.standard_normal((2, len(t))), spectrum)
        crack, own = noise * swell(t, 0.00035, 0.0011, decay)  # own sounds in the left channel alone
        clang = sum(rng.choice([-1, 1]) * undb(mode_db) * ring(t, hz, t60) for hz, t60, mode_db in coil_modes)
        crack = crack + undb(coil_db) * clang
        left = undb(left_db) * (undb(own_db) * own + crack)
        modes = sum(undb(mode_db) * np.outer([share, 1], ring(t, hz, t60))
                    for hz, t60, mode_db, share in recoil_modes)
        shudder = unit(band(rng.standard_normal(len(t)), low_hz=108.0, high_hz=320))
        shudder = shudder * swell(t, 0.0071, 0.0015, 0.017)
        thump = modes + undb(body_db) * np.outer([-.2, 1], shudder)
        blast = np.array([left, far_port(crack, lag_s)])
        add(out, s, undb(db + blast_db) * blast + undb(thump_db) * thump)
    for hz, t60, db, share in slam_modes:
        add(out, slam_s, undb(db) * np.outer([share, 1], ring(t, hz, t60)))
    for hz, t60, db, share in long_rings:
        rising = ring(t, hz, t60) * (1 - np.exp(-t / ring_rise_s))
        add(out, SHOT_S, undb(db) * np.outer([share, 1], rising))
    return signal.sosfilt(signal.butter(2, low_hz, "high", fs=SR, output="sos"), out)


def scene():
    """Superposition: birds, trees and insects until they break off abruptly, the shot, the smaller noises and
    the rumble."""
    outdoors = among_trees(birds() + far_colony()) + background() + later_insects()
    outdoors = outdoors * np.clip((BIRDS_END_S - TIME) / 0.0028, 0, 1)
    smaller_noises = knocks_and_thumps() + rattle() + rubbing() + soft_bursts()
    return outdoors + shot() + smaller_noises + rumble() + stop_click()


def record(dry):
    """Channel mixing and low-pass: the wide image narrows to one channel after the shot; peaks and top are cut."""
    top_hz = 15300
    width = np.interp(TIME, [3.58, 3.8], [1, 0])
    both = np.array([width * dry[0] + (1 - width) * dry[1], dry[1]])
    return signal.sosfilt(signal.ellip(8, .2, 70, top_hz, fs=SR, output="sos"), np.clip(both, -.97, .97))


dry = scene()
out = record(dry)
to_wav(out)
```